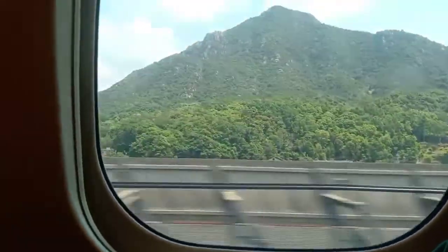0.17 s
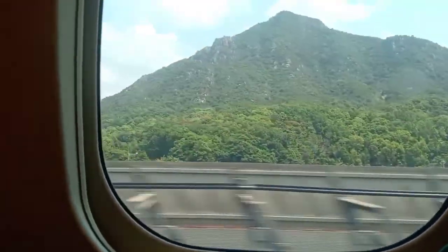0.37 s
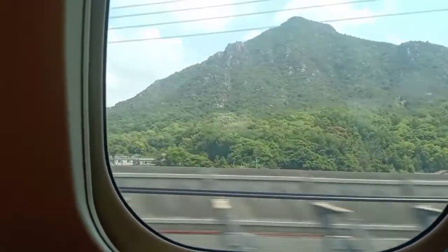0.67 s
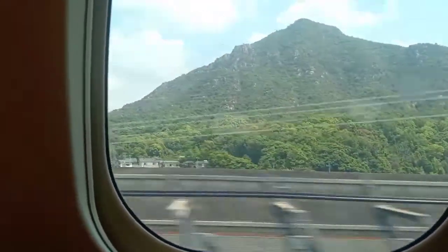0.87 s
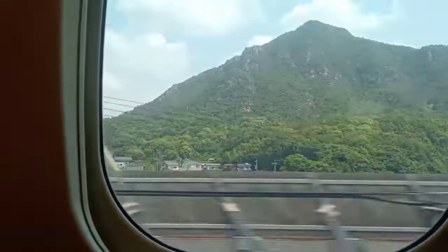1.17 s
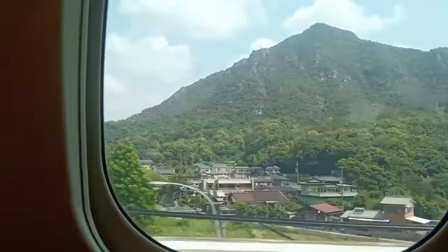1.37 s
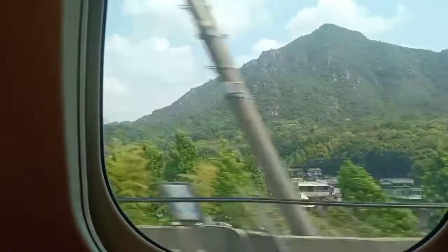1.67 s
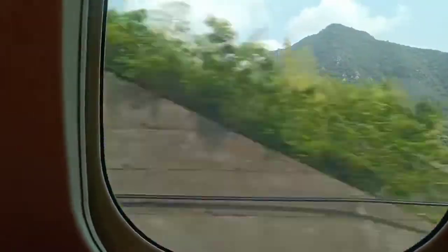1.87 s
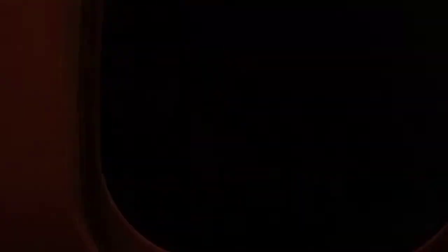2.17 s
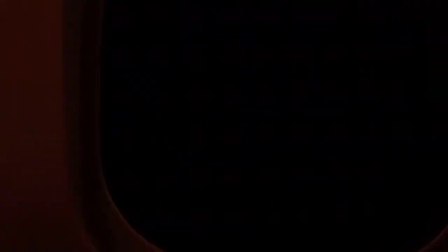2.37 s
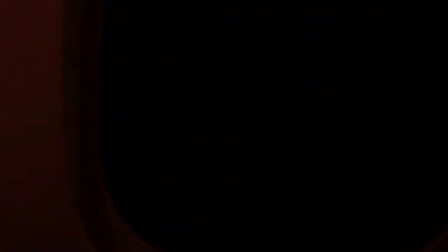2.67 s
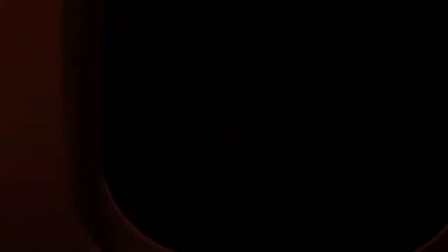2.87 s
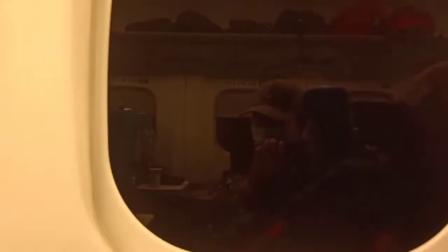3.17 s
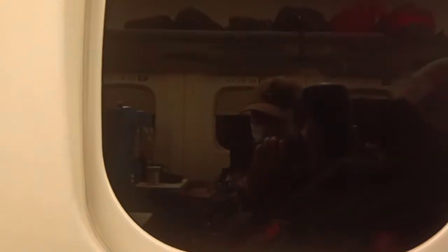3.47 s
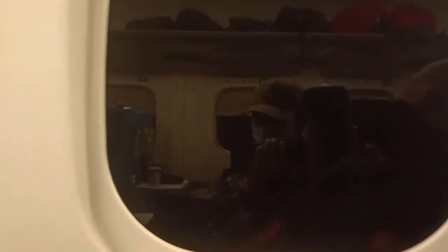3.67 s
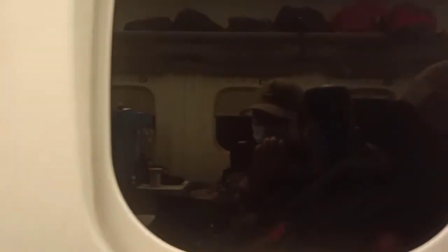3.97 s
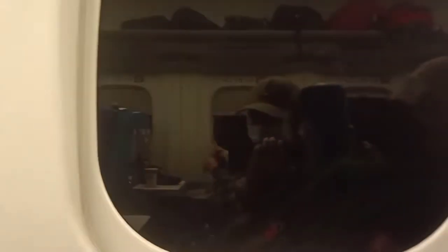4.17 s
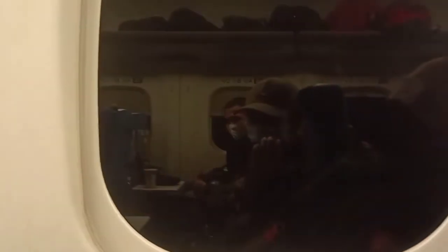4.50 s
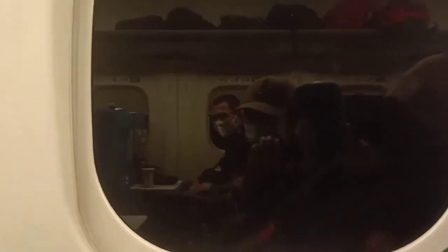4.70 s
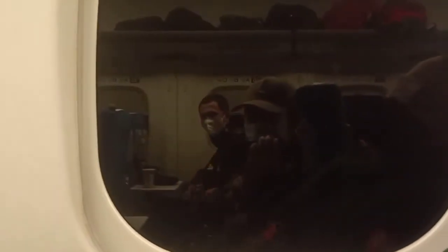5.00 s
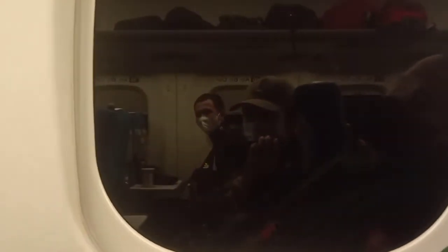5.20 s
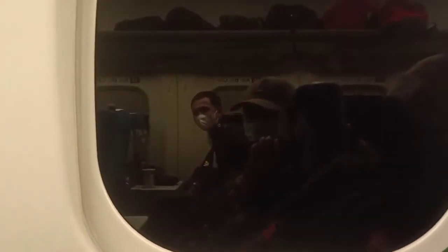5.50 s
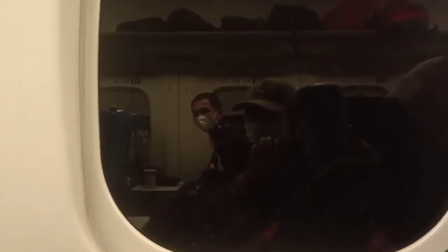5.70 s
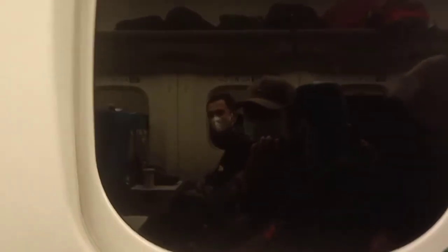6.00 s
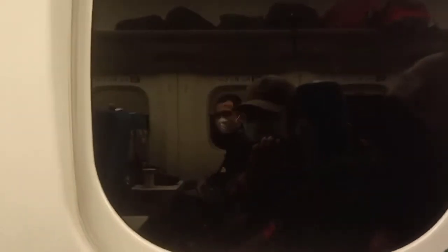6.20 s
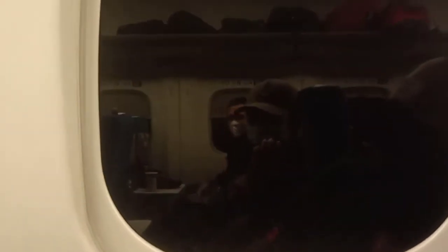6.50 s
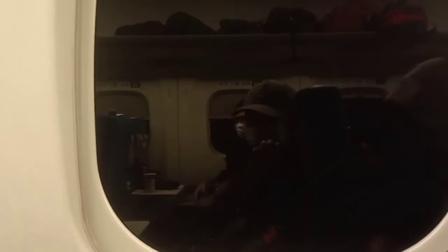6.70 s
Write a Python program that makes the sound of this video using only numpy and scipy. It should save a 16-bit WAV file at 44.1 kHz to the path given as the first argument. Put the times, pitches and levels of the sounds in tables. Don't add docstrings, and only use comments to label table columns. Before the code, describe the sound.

Low cabin roar of wheels and wind, light plastic clicks close by, then tunnel entry makes everything louder, fuller and rougher.

```python
import sys
import numpy as np
from scipy import signal
from scipy.fft import rfft, irfft, next_fast_len
from scipy.io import wavfile
from scipy.ndimage import uniform_filter1d

SR = 44100
rng = np.random.default_rng(int(sys.argv[2]) if len(sys.argv) > 2 else 0)


def linear_from_db(decibels):
    return 10 ** (np.asarray(decibels, float) / 20)


def master_out(mix):
    frames = np.transpose(np.atleast_2d(mix))
    ceiling = np.clip(frames, -1, 1)
    pcm = np.round(ceiling * 32767).astype(np.int16)
    wavfile.write(sys.argv[1], SR, pcm)


N = 302078

# open_air_db, tunnel_gain_db, delay_s, track_share (how much track roughness is felt, 0-1)
PATHS = [
    (-27.5, 7.3, 0.021, 0.8),
    (-35.5, 9, 0.025, 0.37),
    (-51, 12, 0.0029, 0.48),
    (-63, 10.5, 0.02, .4),
]
PATH_EDGES = [200, 1300, 3300]
# pitch_hz, level_db (per Hz)
OPEN_AIR_COLOUR = [(20, -37.5), (42, -21), (56, 0), (150, -2.5), (228, -14), (400, -23), (940, -29.5),
                   (1250, -37.5), (2400, -41.5), (3400, -52), (4900, -53.5), (5800, -59.5), (7300, -76),
                   (9000, -100)]
# pitch_hz, level_db (per Hz)
TUNNEL_COLOUR = [(22, -34.5), (42, -26.5), (58, -2), (170, -5), (264, -13.5), (403, -15), (542, -21.5),
                 (1050, -25), (1410, -36), (2540, -32.5), (3500, -43.5), (5100, -47.5), (7100, -62),
                 (8000, -83)]
# pitch_hz, width_hz, boost_db
RESONANCES = [(72, 6.2, 2), (123, 35, 2.5), (162, 4.4, 2.5), (980, 210, 1), (2584, 490, 4.5),
              (3000, 350, 3), (5000, 320, 0)]
# pitch_hz, shared_part (0-1)
SHARED_SOUND = [(25, 0.49), (60, 1), (180, 0.96), (330, 0.92), (450, 0.58), (560, 0.12), (1000, 0.24),
                (1500, 0.005)]
# pitch_hz, left_minus_right_db
PORT_BALANCE = [(140, 0), (330, 3), (470, 2.5), (620, -3.5), (1100, -1.5), (1400, 0.5), (4500, -1),
                (5400, -2.5), (7000, -1)]
# pitch_hz, level_db
MOTOR_LINES = [
    (1036, -67),
    (2463, -69),
    (4930, -85.5),
]
# start_s, body_db, body_hz, treble_db
TOUCHES = [(0.306, -46, 2012, -68.5), (0.397, -57, 4484, -62.5), (0.442, -57.5, 4830, -69),
           (.618, -62, 5000, -63.5), (0.663, -53.5, 4510, -75), (0.804, -56, 4030, -80.5),
           (1.230, -42, 4000, -63), (1.251, -53.5, 4500, -73), (1.379, -44, 5000, -55.5),
           (1.385, -35, 5270, -49.5), (1.394, -43, 3110, -55.5), (1.418, -52, 2570, -59.5),
           (1.452, -49.5, 3000, -66.5), (2.523, -42.5, 4320, -65), (2.546, -55.5, 5000, -67.5),
           (3.507, -49, 6000, -63), (3.934, -52.5, 6090, -64.5), (4.298, -53.5, 6020, -61.5),
           (4.795, -44.5, 5000, -58.5), (5.474, -48, 5500, -62.5), (5.888, -40.5, 6100, -52.5),
           (5.905, -56, 5630, -63.5)]
# pitch_hz, level_db (per Hz)
HISS_COLOUR = [(6000, -10.5), (7500, -1), (8600, 0.5), (9600, -5.5), (10300, 0), (11400, 2), (12600, -6.5),
               (13600, 2.5), (14400, -5.5), (15200, -3), (16000, -13)]
# start_s, level_db
CASE_CREAKS = [(.077, -71), (.18, -64), (2.13, -61), (2.199, -65), (2.452, -64), (2.74, -63), (2.841, -63),
               (2.889, -59), (4.511, -64), (4.653, -65), (5.212, -65.5), (5.612, -66), (6.004, -64.5),
               (6.02, -67.5), (6.052, -58), (6.823, -57)]
# time_s, level_db
TRACK_ROUGHNESS = [(0, 1.1), (.7, -1.5), (1.1, 1.6), (1.4, 3), (1.8, -.5), (2.3, -0.8), (2.9, 0.2),
                   (3.4, -.3), (4.4, 0.6), (5.0, 0), (5.6, 1), (6.1, 0.3), (6.85, -1.2)]

PORTAL_S, ENTRY_S = 1.97, 0.065


def running_noise(t, hz):
    deepen_db, deepen_s = 2.11, 2.9
    building_db = deepen_db * (1 - np.exp(-np.maximum(t - PORTAL_S, 0) / deepen_s))
    flutter_db, flutter_hz = [0.8, 0.46, 0.61, 0.44], [7.0, 5.7, 5.5, 2.6]
    inside = enclosed(t)
    boost_db = sum(db / (1 + (2 * (hz - f) / width) ** 2) for f, width, db in RESONANCES)
    outside = two_ports(hz) * linear_from_db(boost_db)
    above = [1] + [1 / (1 + (edge / (hz + 1)) ** 8) for edge in PATH_EDGES] + [0]
    roar = 0
    for k, (open_air_db, gain_db, delay_s, track_share) in enumerate(PATHS):
        level_db = open_air_db + gain_db * enclosed(t, delay_s) + building_db
        level_db = level_db + track_share * curve(TRACK_ROUGHNESS, t)
        level_db = level_db + flutter_db[k] * walk(flutter_hz[k])
        part = outside * (above[k] - above[k + 1])
        free = unit(irfft(part * linear_from_db(curve(OPEN_AIR_COLOUR, hz, log=True)))[:, :N])
        walled = unit(irfft(part * linear_from_db(curve(TUNNEL_COLOUR, hz, log=True)))[:, :N])
        roar = roar + ((1 - inside) * free + inside * walled) * linear_from_db(level_db)
    return roar


def two_ports(hz):
    window_share, window_lag = 0.16, 18
    both, window, left, right = rfft(rng.standard_normal((4, 2 * len(hz) - 2)))
    shared = np.clip(curve(SHARED_SOUND, hz, log=True), 0, 0.999)
    from_window = window_share * (1 - shared)
    late = np.exp(-2j * np.pi * hz * window_lag / SR)
    pair = np.sqrt(shared) * both
    pair = pair + np.sqrt(from_window) * window * np.array([late, late ** 0])
    pair += np.sqrt(1 - shared - from_window) * np.array([left, right])
    balance_db = curve(PORT_BALANCE, hz, log=True)
    return pair * linear_from_db(np.array([balance_db, -balance_db]) / 2)


def enclosed(t, delay_s=0.0):
    return 1 / (1 + np.exp(-(t - PORTAL_S - delay_s) / ENTRY_S))


def motors():
    hum = 0
    for pitch_hz, level_db in MOTOR_LINES:
        wandering_hz = pitch_hz * (1 + 0.0072 * walk(5.2))
        turn = 2 * np.pi * np.cumsum(wandering_hz) / SR
        level = linear_from_db(level_db + 6.0 * walk(4.8))
        hum = hum + level * np.sqrt(2) * np.sin(turn + rng.uniform(0, 2 * np.pi, (2, 1)))
    return hum


def ticks():
    out = np.zeros((2, N + SR))
    t = np.arange(SR // 3) / SR
    scuff = np.minimum(t / 0.0022, 1) * np.exp(-t / 0.0047)
    tail = linear_from_db(-13.5) * np.minimum(t / 0.009, 1) * np.exp(-np.log(1000) * t / 0.27)
    for start_s, body_db, body_hz, treble_db in TOUCHES:
        pan_db = -3.5 + 1.0 * rng.standard_normal()
        rub = rng.standard_normal((2, len(t))) * (scuff + tail)
        body = linear_from_db(body_db + 2.5) * band(rub, 0.42 * body_hz, 1.16 * body_hz)
        treble = linear_from_db(treble_db + 4.5) * band(rub, 6500, 15000)
        i = int(start_s * SR)
        out[:, i:i + len(t)] += (body + treble) * linear_from_db(np.array([[pan_db], [-pan_db]]) / 2)
    return out[:, :N]


def creaks():
    out = np.zeros(N + SR)
    t = np.arange(SR // 20) / SR
    for start_s, level_db in CASE_CREAKS:
        slip = rng.standard_normal(len(t)) * np.minimum(t / 0.00207, 1) * np.exp(-t / 0.004)
        ring = band(slip, 13100, 14200) + 0.4 * band(slip, 8000, 15500)
        i = int(start_s * SR)
        out[i:i + len(t)] += linear_from_db(level_db + 2.5) * ring
    return out[:N] * linear_from_db(np.array([[0], [-8]]))


def mic_hiss(t, hz):
    hiss_db, tunnel_gain_db = -77, 2.5
    noise = rfft(rng.standard_normal((2, 2 * len(hz) - 2)))
    noise = noise * linear_from_db(curve(HISS_COLOUR, hz, log=True)) * (hz > 5000)
    rustle_db = 1.6 * walk(5.0) + 1.2 * walk(14.0)
    return unit(irfft(noise)[:, :N]) * linear_from_db(hiss_db + tunnel_gain_db * enclosed(t) + rustle_db)


def curve(table, x, log=False):
    at, value = np.transpose(table)
    return np.interp(np.log(x + 1), np.log(at), value) if log else np.interp(x, at, value)


def unit(x):
    return x / np.sqrt(np.mean(x ** 2))


def walk(rate_hz):
    step = int(SR / rate_hz)
    held = np.repeat(rng.standard_normal(N // step + 1), step)
    return 0.53 * uniform_filter1d(uniform_filter1d(held, step), step)[:N]


def band(x, lo_hz, hi_hz):
    sos = signal.butter(2, [lo_hz, hi_hz], "bandpass", fs=SR, output="sos")
    return signal.sosfilt(sos, x) * np.sqrt(SR / 2 / (hi_hz - lo_hz))


def scene():
    t = np.arange(N) / SR
    size = 2 * next_fast_len(N // 2 + 1)
    hz = np.arange(size // 2 + 1) * SR / size
    return running_noise(t, hz) + motors() + ticks() + creaks() + mic_hiss(t, hz)


def low_pass(x):
    return signal.sosfilt(signal.butter(12, 15500, fs=SR, output="sos"), x)


def record(dry):
    return low_pass(dry)


dry = scene()
out = record(dry)
master_out(out)
```